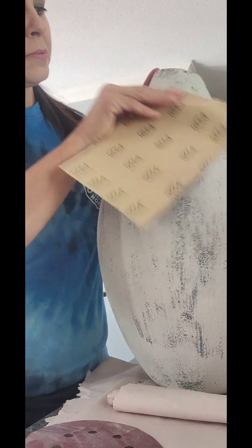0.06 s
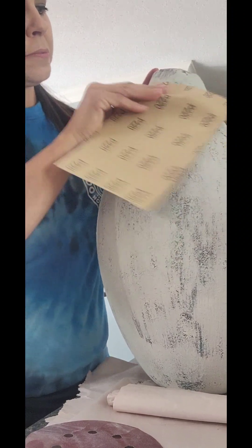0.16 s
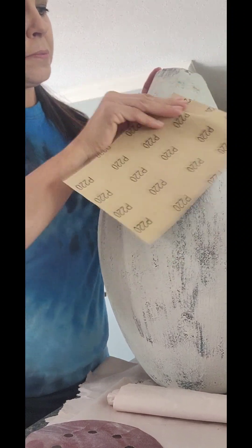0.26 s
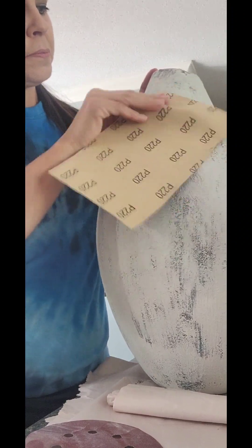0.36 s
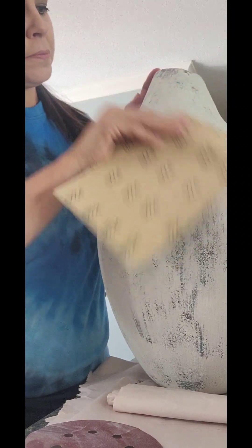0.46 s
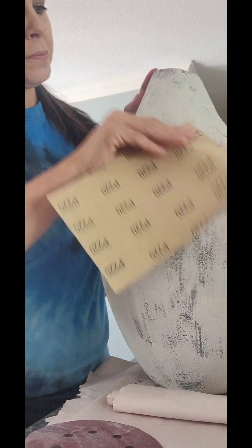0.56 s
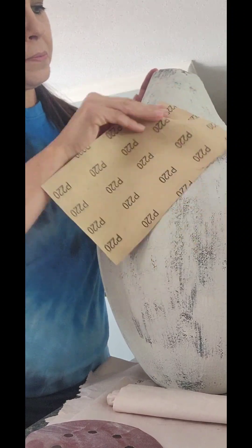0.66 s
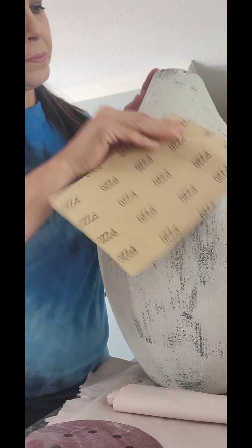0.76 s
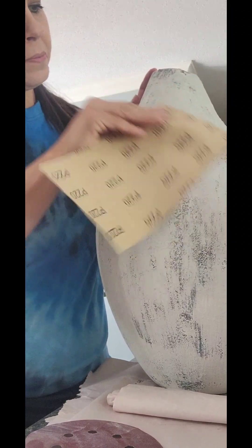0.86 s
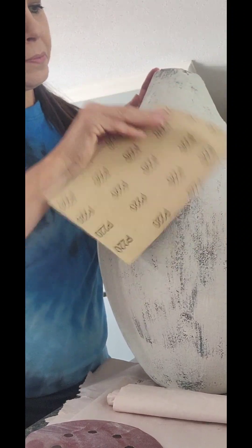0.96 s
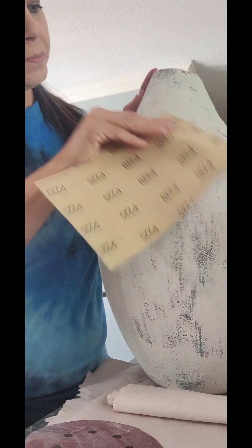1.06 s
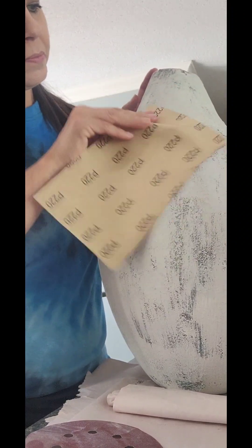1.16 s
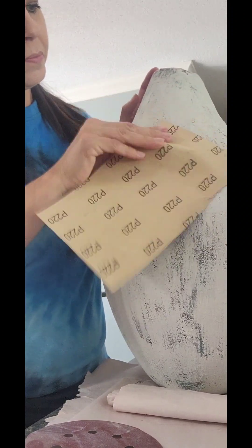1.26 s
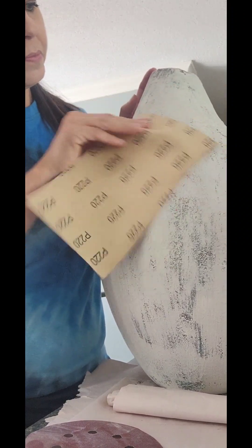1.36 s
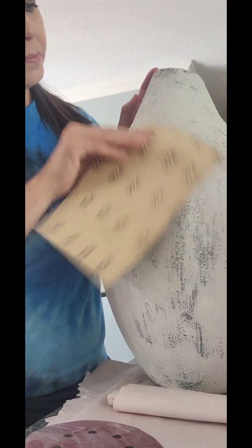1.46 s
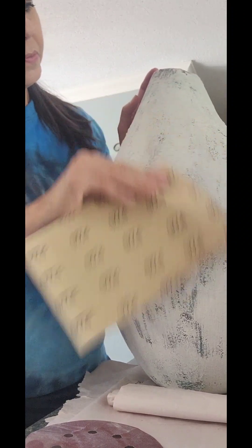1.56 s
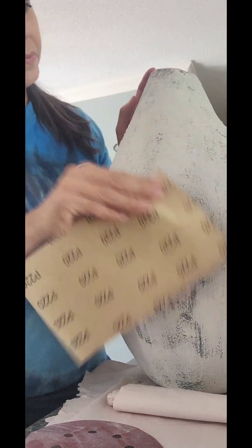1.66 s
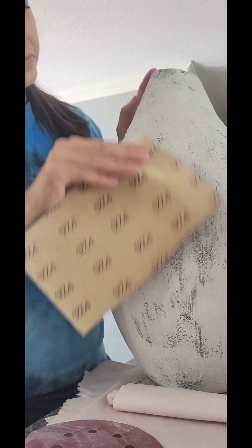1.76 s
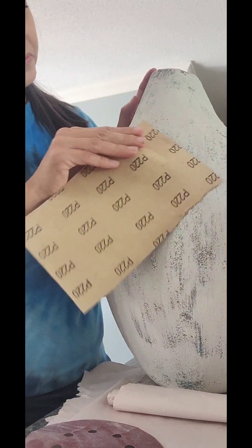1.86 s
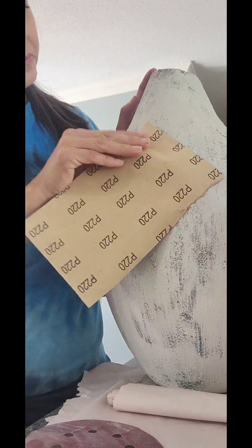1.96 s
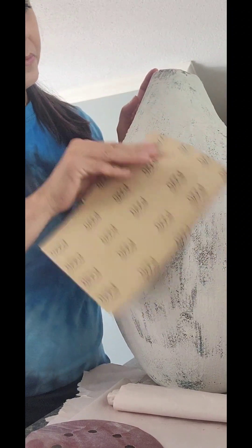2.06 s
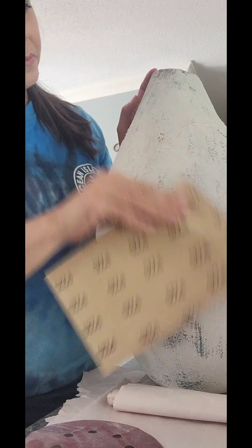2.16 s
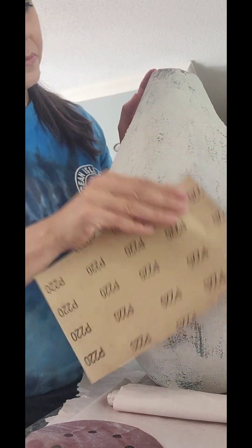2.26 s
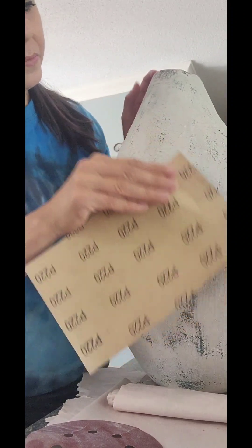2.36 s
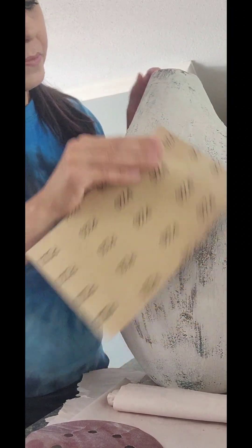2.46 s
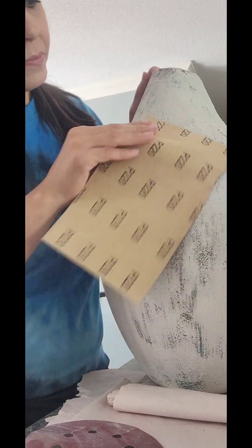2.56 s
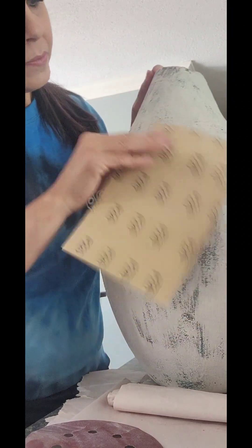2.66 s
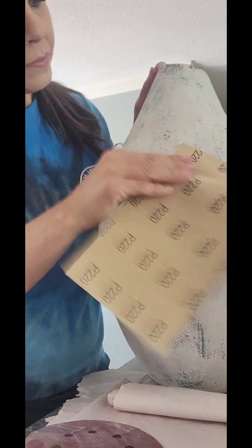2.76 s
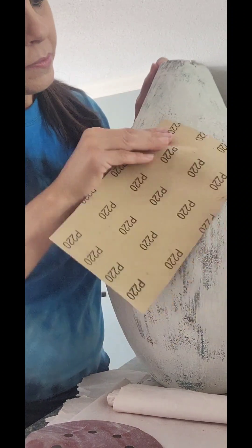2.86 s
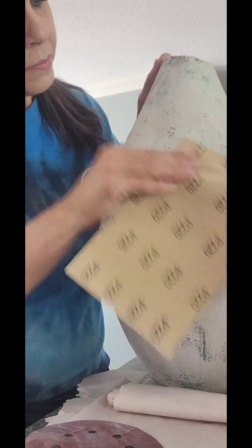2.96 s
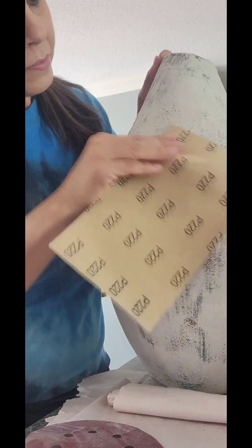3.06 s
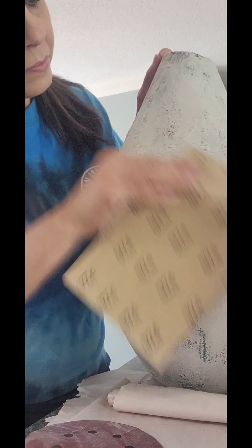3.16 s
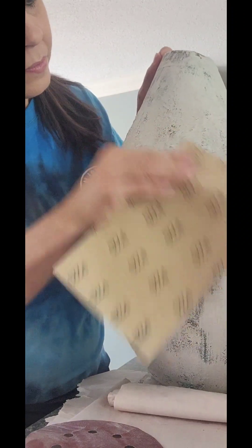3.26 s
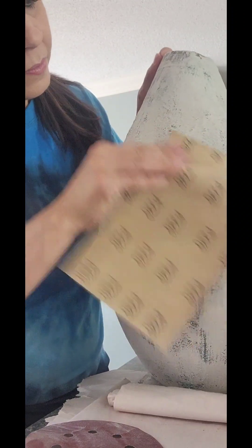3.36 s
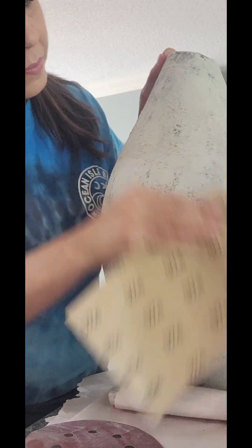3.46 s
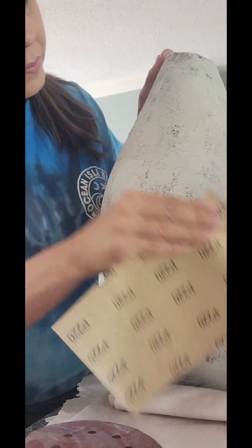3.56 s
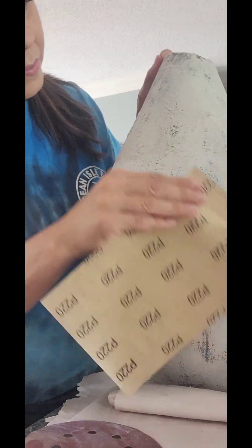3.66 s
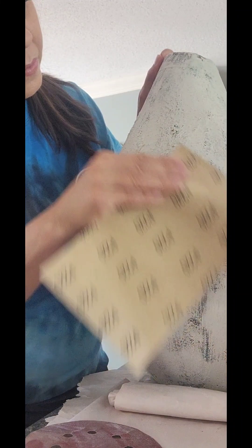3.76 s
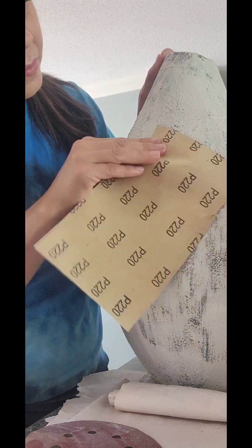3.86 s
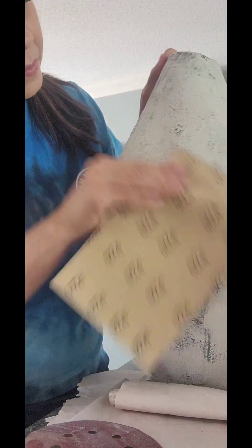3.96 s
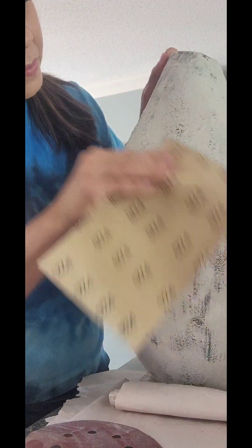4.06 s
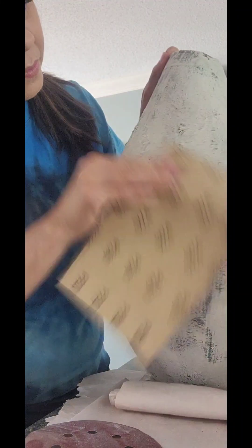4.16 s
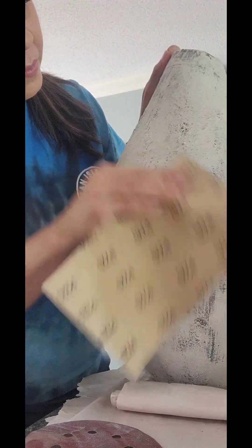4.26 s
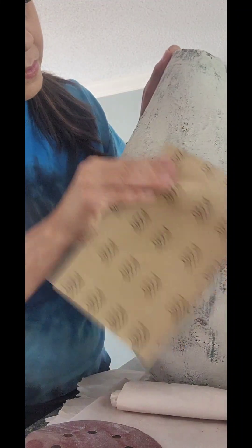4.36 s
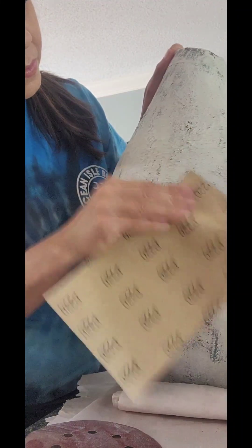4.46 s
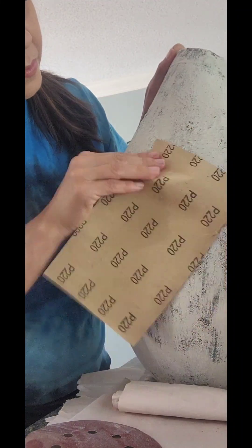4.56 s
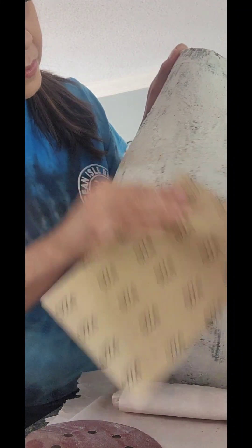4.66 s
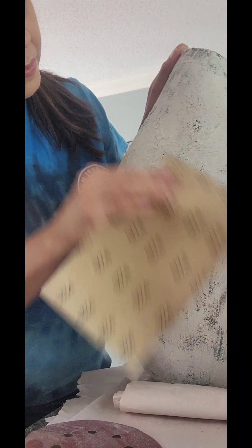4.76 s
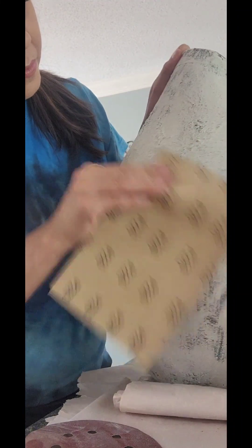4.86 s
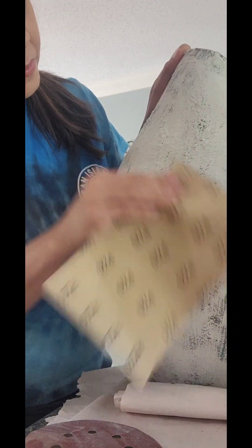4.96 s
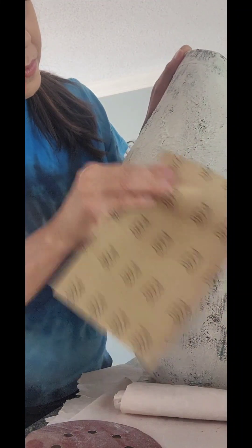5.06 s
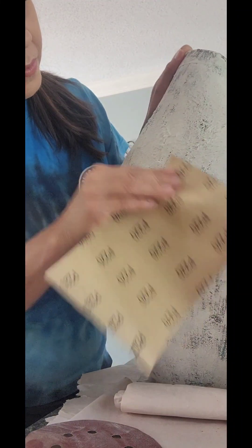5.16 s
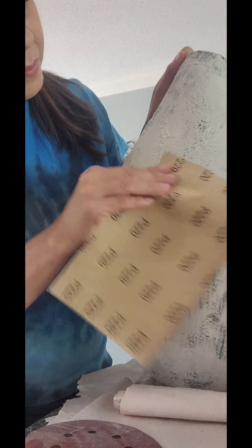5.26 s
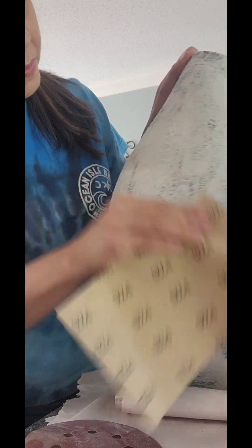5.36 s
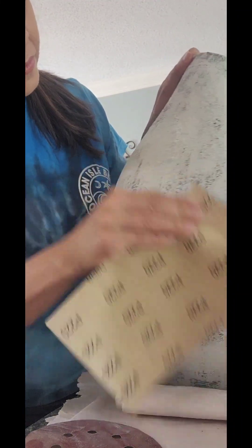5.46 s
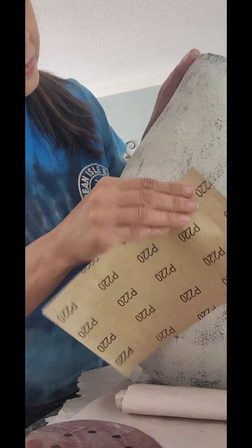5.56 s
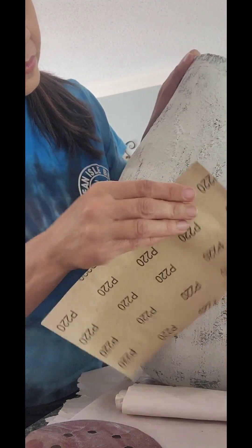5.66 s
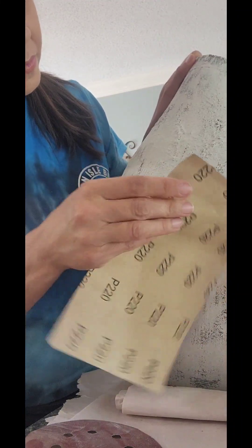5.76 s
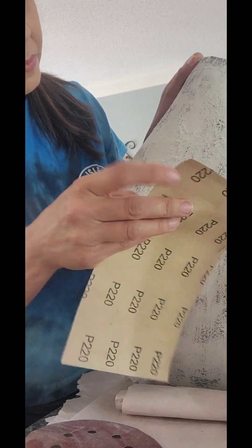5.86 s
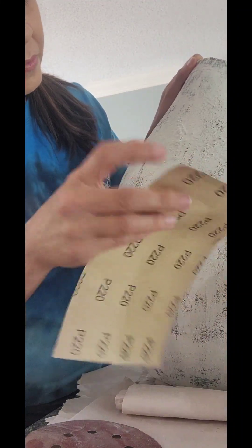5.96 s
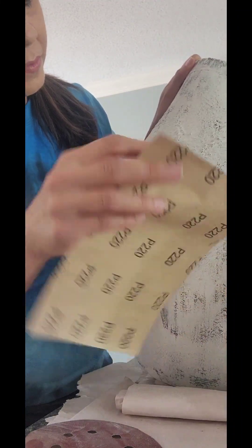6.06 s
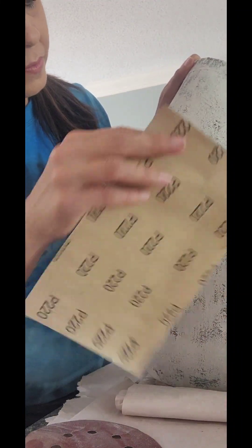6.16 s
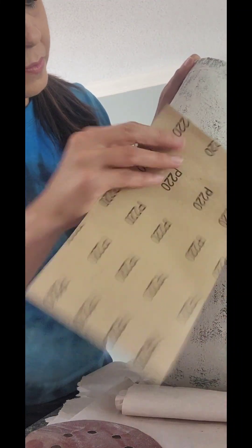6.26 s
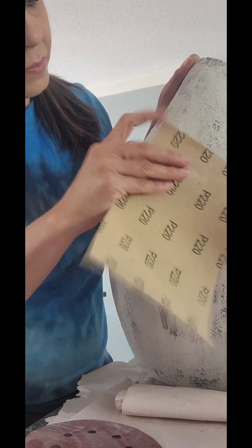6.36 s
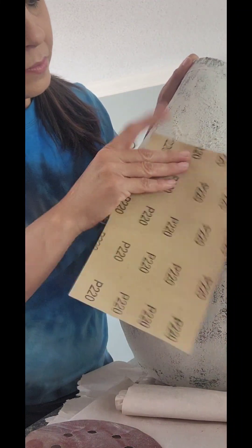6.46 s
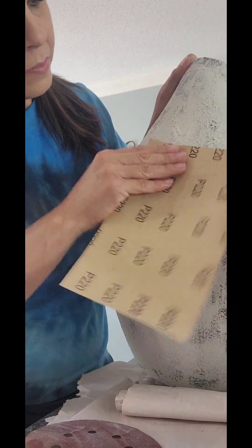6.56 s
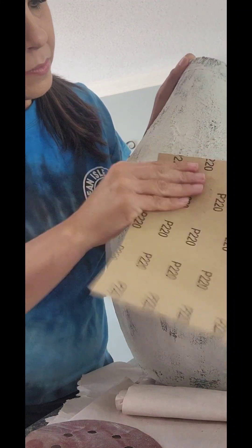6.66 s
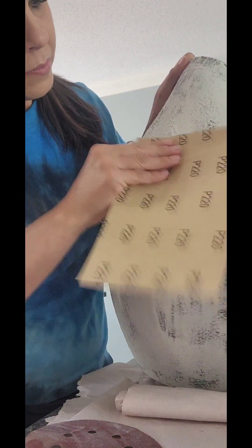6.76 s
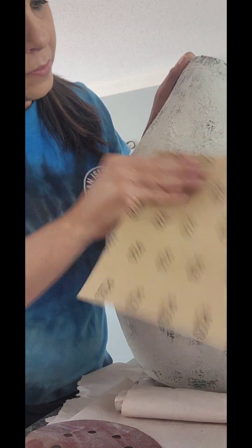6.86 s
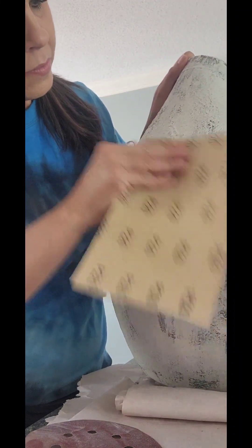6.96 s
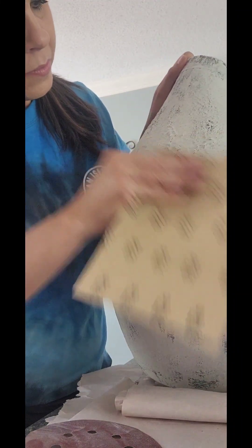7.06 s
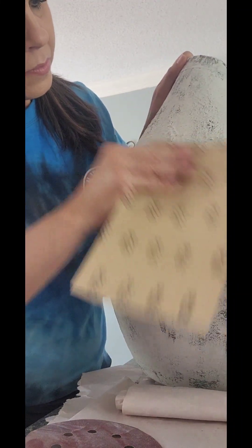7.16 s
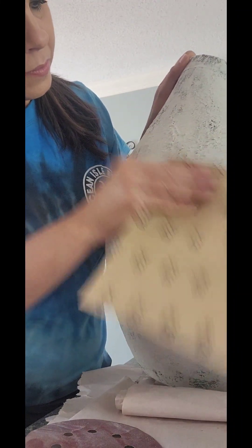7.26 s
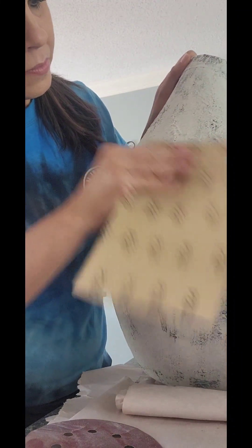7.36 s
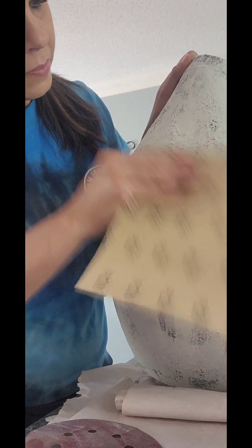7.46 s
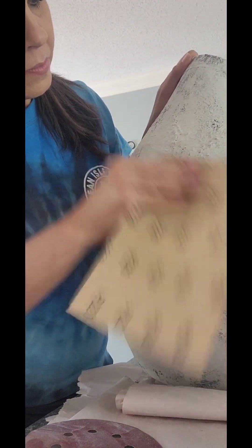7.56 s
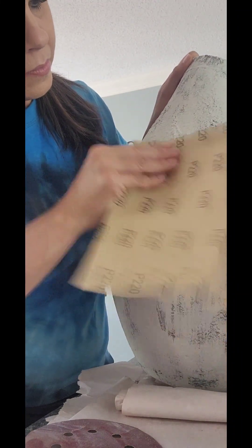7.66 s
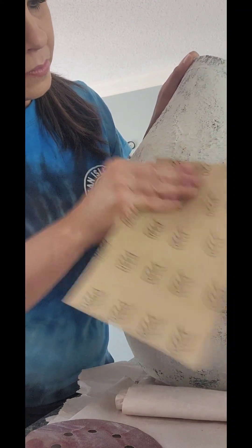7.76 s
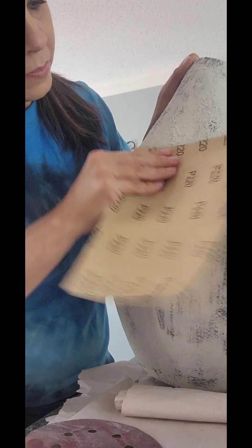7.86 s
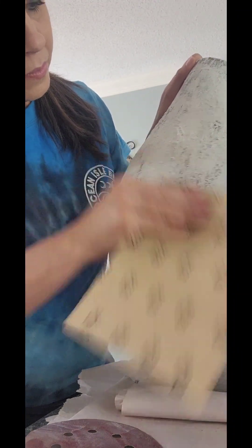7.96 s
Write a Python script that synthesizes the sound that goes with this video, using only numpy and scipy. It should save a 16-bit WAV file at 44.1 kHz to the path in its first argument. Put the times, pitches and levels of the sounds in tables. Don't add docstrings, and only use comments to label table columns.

```python
import sys
import numpy as np
from scipy import signal
from scipy.fft import rfft, irfft
from scipy.io import wavfile
from scipy.ndimage import uniform_filter1d

SR = 44100
rng = np.random.default_rng(int(sys.argv[2]) if len(sys.argv) > 2 else 0)


def put_to_file(sound):
    columns = np.atleast_2d(sound).T
    safe = np.clip(columns, -1, 1)
    whole_steps = np.round(safe * 32767)
    wavfile.write(sys.argv[1], SR, whole_steps.astype(np.int16))


def undo_db(level):
    steps = np.asarray(level, float) / 20
    return 10 ** steps


N = 354123
HZ = np.fft.rfftfreq(512, 1 / SR)


def evened(x):
    return x / np.sqrt(np.mean(x ** 2) + 1e-20)


def read(points, hz, column=1):
    table = np.transpose(points)
    return np.interp(np.log(hz + 1), np.log(table[0] + 1), table[column])


def bell(hz, width):
    return 1 / (1 + (2 * (HZ - hz) / width) ** 2)


def drifting(hz, width, drift):
    wander = 0.035
    return 1 / (1 + (2 * (HZ[:, None] - hz * (1 + wander * drift)) / width) ** 2)


# hz, density_db (per Hz)
FLOOR_SPECTRUM = [(15, -30), (25, -1.5), (114, 3.5), (451, -13), (560, -6), (863, -15), (962, -11.5),
                  (2610, -10.5), (5000, -17), (8830, -30), (16000, -39)]
# hz, rms_db
HUM_TONES = [(70.0, -81), (113.0, -75.5), (231.5, -81)]


def floor():
    noise = rng.standard_normal((2, N))
    shape = undo_db(read(FLOOR_SPECTRUM, np.fft.rfftfreq(N, 1 / SR)))
    t = np.arange(N) / SR
    hum = sum(undo_db(db + 4) * np.sin(2 * np.pi * hz * t) for hz, db in HUM_TONES)
    shared = noise + 0.41 * noise[::-1]
    return hum + undo_db(-64.5) * evened(irfft(rfft(shared) * shape, N))


# start_s, end_s, early_level_db, late_level_db, palm_pressure_db
SHOULDER_STROKES = [(-0.04, 0.046, -24, -27.5, -1), (0.081, 0.152, -27.5, -24, -1.5),
                    (0.183, 0.265, -27.5, -26.5, 0.5), (0.3, 0.376, -26, -24.5, -1.5),
                    (0.406, 0.485, -30, -28.5, 4.5), (0.532, 0.628, -21.5, -20.5, -2),
                    (0.7, 0.78, -18, -22, -3.5), (0.822, 0.904, -26, -25, 0.5),
                    (0.932, 1.018, -22.5, -23.5, -1), (1.062, 1.142, -25.5, -25.5, -1.2),
                    (1.164, 1.252, -27, -24, 3), (1.294, 1.377, -28, -22, -3),
                    (1.418, 1.501, -23.5, -22, 1.5), (1.561, 1.717, -20, -25.5, -2.5)]
# start_s, end_s, early_level_db, late_level_db, palm_pressure_db
BELLY_STROKES = [
    (2.183, 2.303, -21.5, -22, -7),
    (2.789, 2.861, -22, -19, -4),
    (2.903, 2.973, -17.5, -18.5, -5),
    (3.017, 3.091, -25, -20, -2),
    (3.124, 3.193, -22.5, -22, -1.5),
    (3.228, 3.313, -23.5, -19.5, -2),
    (3.353, 3.43, -19, -22.5, -4.5),
    (3.473, 3.587, -22, -21, -3.5),
]
# start_s, end_s, early_level_db, late_level_db, palm_pressure_db
FLANK_STROKES = [(3.881, 3.967, -21, -21.5, 0), (4.012, 4.103, -25.5, -22.5, 0),
                 (4.133, 4.212, -24, -22, 2.5), (4.243, 4.334, -23, -24, 1.5),
                 (4.365, 4.433, -18, -23.5, -2), (4.465, 4.551, -23.5, -23.5, 0),
                 (4.591, 4.672, -20, -20.5, -0.5), (4.705, 4.803, -24.5, -21, 1),
                 (4.842, 4.909, -17.5, -18.5, 0.5), (4.951, 5.035, -23.5, -25, 5),
                 (5.062, 5.123, -21, -18.5, 0.7), (5.159, 5.22, -23, -24.5, 3.5),
                 (5.249, 5.31, -26.5, -24.5, 8.5), (5.413, 5.498, -20, -25, 0)]
# start_s, end_s, early_level_db, late_level_db, palm_pressure_db
ACROSS_STROKES = [(6.711, 6.77, -27.5, -25, 9), (6.813, 6.876, -21.5, -23, 2),
                  (6.923, 6.989, -22, -22.5, 2.5), (7.036, 7.097, -24.5, -22.5, 3.5),
                  (7.143, 7.206, -25.5, -22, 6), (7.246, 7.313, -22, -25, 5), (7.355, 7.424, -21, -23, 0.5),
                  (7.467, 7.536, -23.5, -20, 3), (7.583, 7.652, -21.5, -23, 2.5),
                  (7.695, 7.766, -21, -21.5, 7.5), (7.814, 7.877, -22, -23.5, 0.5),
                  (7.914, 7.966, -21.5, -19.5, 10), (8.02, 8.063, -24.5, -32, 3)]
# fizz_db, push_over_pull_fizz_db, fizz_gained_per_stroke_db, vase_sway_db
BOUT_HOLDS = [
    (-4, -0.5, 0.29, -69.5),
    (-2.3, -2, 0.28, -69),
    (-0.5, 0, 0.16, -66.5),
    (-1, -0.1, 0.29, -53.5),
]


def strokes():
    t = np.arange(N) / SR
    parts, sway = [], np.zeros(N)
    start_loss_db, start_sharpness = 5.66, 3.33
    brake_loss_db, brake_sharpness = 4.74, 4.5
    bouts = (SHOULDER_STROKES, BELLY_STROKES, FLANK_STROKES, ACROSS_STROKES)
    for bout, (fizz_db, push_db, gained_db, sway_db) in zip(bouts, BOUT_HOLDS):
        for k, (start, end, early_db, late_db, press_db) in enumerate(bout):
            span = slice(max(round((start - .1) * SR), 0), round((end + .1) * SR))
            place = (2 * t[span] - start - end) / (end - start)
            level_db = np.interp(place, [-.4, .4], [early_db, late_db]) + 0.44
            starting_db = start_loss_db * abs(place) ** start_sharpness
            braking_db = brake_loss_db * abs(place) ** brake_sharpness
            slow_db = np.minimum(np.where(place < 0, starting_db, braking_db), 150)
            held_db = np.minimum(slow_db, 18)
            bright_db = fizz_db + (-1) ** k * push_db + k * gained_db - 0.34 * press_db
            parts.append((span, level_db - slow_db, bright_db - 1.08 * held_db, press_db + 0.86 * held_db))
            sway[span] += undo_db(sway_db - slow_db / 4)
    return parts, sway


# time_s, level_db
JOLT_TIMES = [(0.01, -58), (0.18, -55), (0.38, -65), (0.54, -58), (0.64, -50), (0.71, -47), (0.94, -53),
              (1.16, -63), (1.41, -49), (1.62, -46), (1.69, -54), (3.02, -50), (3.4, -67), (4.02, -53),
              (4.36, -55), (4.68, -45), (4.96, -49), (5.16, -47), (5.25, -55), (5.37, -56), (6.64, -52),
              (6.74, -48), (6.96, -48.5), (7.07, -51), (7.24, -47), (7.4, -60), (7.49, -46), (7.66, -51),
              (7.76, -45), (7.83, -55)]
# hz, width_hz, level_db
ROCK_MODES = [(79.7, 49, -0.5), (130, 40, -10)]


def rocking(level, sway):
    t = np.arange(N) / SR
    rock = sway.copy()
    for s, jolt_db in JOLT_TIMES:
        span = slice(max(round((s - .1) * SR), 0), round((s + .1) * SR))
        rock[span] += undo_db(jolt_db) * np.exp(-((t[span] - s) / 0.025) ** 2)
    power = abs(uniform_filter1d(level ** 2, size=4000))
    rock += undo_db(-63.5) * (power / undo_db(-51.0)) ** 0.25
    noise = rng.standard_normal((2, N))
    hz = np.fft.rfftfreq(N, 1 / SR)
    shape = sum(undo_db(db) / (1 + (2 * (hz - f) / width) ** 2) ** 2 for f, width, db in ROCK_MODES)
    thrum = irfft(rfft(noise + 1.1 * noise[0]) * shape, N)
    return np.array([evened(port) for port in thrum]) * rock


# time_s, peak_db
GRIT_BITES = [(0.3047, -30.5), (0.582, -13), (0.9694, -25.5), (1.1144, -23), (1.7174, -31), (2.2314, -29),
              (2.787, -6.5), (3.9975, -10), (4.588, -9.5), (4.849, -18.5), (5.078, -10.5), (5.243, -20),
              (6.388, -23), (6.408, -34), (6.6886, -23), (6.714, -21), (6.8109, -21), (7.033, -2.5),
              (7.24, -3), (7.352, -14), (7.416, -6), (7.4587, -2.5), (7.4974, -28), (7.5867, -23),
              (7.69, -0.5), (7.8151, -10), (7.916, -25)]


def bites():
    grabs, t = np.zeros(N), np.arange(3000) / SR
    s, peak_db = np.transpose(GRIT_BITES)
    grabs[(s * SR).astype(int)] = undo_db(peak_db - 14)
    ease = (1 - np.exp(-t / 0.003)) * np.exp(-t / 0.0062)
    return signal.oaconvolve(grabs, ease)[:N]


# start_s, end_s, first_level_db, last_level_db,
# palm_pressure_db
LIGHT_SLIDES = [(0.65, 0.69, -32, -36.5, 5), (1.932, 2.089, -47, -47, 0.5), (2.105, 2.201, -41, -31.5, 5.5),
                (2.656, 2.767, -45.5, -38.5, -0.5), (2.747, 2.789, -43.5, -17.5, -0.5),
                (3.596, 3.7, -32, -57, 6.5), (3.831, 3.883, -41, -25, -8),
                (5.336, 5.411, -27.5, -28.5, 8.5), (5.486, 5.604, -30, -67.5, 5),
                (5.702, 5.798, -58, -43.5, 5.5), (5.788, 5.934, -43.5, -57, 5),
                (5.99, 6.2, -62.5, -74.5, 5.5), (6.232, 6.269, -52.5, -59, 5.5),
                (6.253, 6.267, -51, -50, -12.5), (6.455, 6.475, -46, -35.5, -8),
                (6.342, 6.449, -61.5, -48, 6), (6.466, 6.512, -31, -56, 0), (6.515, 6.604, -39.5, -32, 2),
                (6.597, 6.69, -52, -49, 7.5), (6.669, 6.742, -57.5, -20.5, -10),
                (7.124, 7.152, -26.5, -30, -11), (7.798, 7.807, -33, -34, -8.5)]


def slides():
    t = np.arange(N) / SR
    parts = []
    for start, end, first_db, last_db, press_db in LIGHT_SLIDES:
        span = slice(round(start * SR), round(end * SR))
        level_db = np.interp(t[span], [start, end], [first_db, last_db])
        light_db = np.clip(-26 - level_db, 0, 26.5)
        edge_s = np.minimum(t[span] - start, end - t[span])
        faded_db = level_db - 30 * np.exp(-edge_s / 0.0033)
        parts.append((span, faded_db, -0.34 * light_db - press_db, 0.43 * light_db + press_db))
    return parts


def rubbing(parts):
    power, fizz, boom = np.full(N, 1e-12), np.zeros(N), np.zeros(N)
    for span, level_db, fizz_db, boom_db in parts:
        part = undo_db(level_db) ** 2
        power[span] += part
        fizz[span] += part * fizz_db
        boom[span] += part * boom_db
    return np.sqrt(power), fizz / power, boom / power


def grit(grain_db, clump_db):
    size = undo_db(grain_db * np.minimum(rng.exponential(1, (2, N)), 3))
    rough = rng.standard_normal((2, N))
    fine = evened(uniform_filter1d(uniform_filter1d(rough[0], 130), 130))
    coarse = evened(uniform_filter1d(uniform_filter1d(rough[1], 600), 600))
    clumps = fine + 0.69 * coarse
    return evened(size * rng.standard_normal((2, N)) * undo_db(clump_db * clumps))


# time_s, peak_db, ring_hz, knock_below_peak_db
SNAPS_AND_TAPS = [(0.701, -1, 2090, -37), (1.675, -8, 1170, -28), (1.704, -6.5, 2170, -40),
                  (1.704, -6, 1250, -37), (1.706, -13.5, 2800, -40), (1.72, -13, 2370, -39),
                  (0.874, -12, 2170, -37), (1.198, -8.5, 2180, -40), (2.15, -24, 1270, -29),
                  (2.228, -8, 1450, -29), (2.273, -9, 2040, -33), (3.525, -6.5, 2540, -29),
                  (3.544, -10, 2340, -31), (5.243, -17, 2100, -21), (3.998, -18, 2200, -27),
                  (5.078, -3, 2200, -32), (4.38, -3.5, 2200, -34.5), (7.584, -10, 2200, -34),
                  (1.944, -33, 4460, -25), (2.661, -44, 2070, -26), (2.699, -30, 3230, -12.5),
                  (3.657, -18.5, 897, -17), (3.657, -24, 2500, -40), (3.837, -26.5, 2260, -18),
                  (5.665, -37, 560, -13.5), (5.909, -37, 3400, -14), (6.233, -48, 500, -9),
                  (6.257, -32, 400, -19.5), (6.396, -32.5, 1170, -5), (6.397, -30, 2050, -30),
                  (6.257, -38, 4300, -32), (6.633, -26, 3400, -32), (6.442, -12.5, 2180, -17.5),
                  (6.47, -7.5, 2140, -43), (6.488, -27, 2200, -16), (6.528, -15.5, 2290, -36),
                  (6.577, -33, 2090, -13), (6.635, -36, 503, -16), (7.126, -9, 2130, -32)]
# hz, level_db, t60_s
HOLLOW_MODES = [(400, -2, 0.03), (472, -8.5, 0.047), (800, -1, 0.022), (1170, 1.5, 0.022)]
# hz, left_over_right_db
TAP_BALANCE = [(1300, -5.5), (2000, -3)]


def snaps():
    t = np.arange(4000) / SR
    crackle, ring = np.zeros(N + 4000), np.zeros((2, N + 4000))
    noise = rng.standard_normal((len(SNAPS_AND_TAPS), 4000))
    rise = 1 - np.exp(-(t / 0.0032) ** 2)
    hollow = sum(undo_db(db - 60 * t / t60) * np.sin(2 * np.pi * hz * t) for hz, db, t60 in HOLLOW_MODES)
    share = 0.48
    for (s, peak_db, hz, knock_db), burst in zip(SNAPS_AND_TAPS, noise):
        at = round((s - .0005) * SR)
        pan_db = read(TAP_BALANCE, hz)
        crackle[at:at + 4000] += undo_db(peak_db + 4.5) * (1 - share) * rise * np.exp(-t / 0.0023) * burst
        tone = 3.1 * share * np.exp(-t / 0.0021) * np.sin(2 * np.pi * hz * t)
        tone = tone + undo_db(knock_db + 7.0) * hollow
        ring[:, at:at + 4000] += undo_db(peak_db) * rise * tone * undo_db([[pan_db / 2], [-pan_db / 2]])
    return crackle[:N], ring[:, :N]


# time_s, free_part (-1 to 1), curl_round_wall (-1 to 1),
# height (0 belly to 1 neck), finger_spread (-1 to 1)
SHEET_GRIP = [(0, -0.44, -0.3, 1, -.5), (.45, 0.2, -0.5, 0.78, -.3), (.65, 0.5, -.5, 0.58, -.3),
              (.9, 0.55, 0.2, 0.52, -.2), (1.4, 0.31, .2, 1, -.2), (1.65, 0.7, 0.4, 0.22, .3),
              (2.0, 0.99, -.3, 1, 0), (2.25, 0.4, -.6, 0.03, .6), (2.8, 0.37, 0.73, 0.45, .3),
              (3.2, 0.33, .7, 0, .3), (3.6, 0.83, 0.68, 0, .3), (3.9, 0.66, .8, 0.26, .4),
              (4.4, 0.54, .5, 0.14, .5), (4.8, 0.48, -0.3, 0.051, .5), (5.5, 0.66, -0.4, 0.43, .4),
              (6.4, 0.83, 0.5, 0.043, 0), (6.8, -0.62, 0.41, 0.13, 0), (7.4, -0.82, 0.72, 0.55, 0.098),
              (8.03, -0.5, 0.45, 0.83, .2)]
# hz, width_hz, level_at_neck_db
NECK_MODES = [(2080, 350, 3), (2750, 700, -2), (3780, 300, 0.5), (5240, 700, -1.5), (7600, 500, -5)]


def grip_colour(t, fizz_db, boom_db):
    s, *grip = np.transpose(SHEET_GRIP)
    free, curl, height, spread = (np.interp(t, s, column) for column in grip)
    shift_db = np.outer(read([(5500, 0.1), (8500, 0.85)], HZ), fizz_db - 1.5 * curl)
    shift_db += np.outer(read([(800, 1), (1100, 0)], HZ), boom_db)
    shift_db += np.outer(bell(1280, 660), 6 * free)
    drift = rng.standard_normal((3, len(t)))
    drift = evened(uniform_filter1d(uniform_filter1d(drift, size=30), size=30))
    shift_db += drifting(2136, 450, drift[0]) * (2.5 - 4 * free)
    shift_db += drifting(3774, 150, drift[1]) * (-9 * height - 3.5)
    shift_db += drifting(6850, 160, drift[2]) * -4.5
    shift_db += np.outer(bell(3400, 500), 5 * curl + 1.0)
    shift_db += np.outer(bell(4460, 600), 2.5 * spread + 0.8)
    neck_db = sum(db * bell(hz, width) for hz, width, db in NECK_MODES)
    shift_db += np.outer(neck_db, height - 0.4)
    patches = rng.standard_normal(shift_db.shape)
    shift_db += 2.3 * evened(uniform_filter1d(uniform_filter1d(patches, 2, 0), 36, 1))
    shift_db += 1.6 * evened(uniform_filter1d(uniform_filter1d(patches[::-1], 9, 0), 14, 1))
    return shift_db


# hz, left_db, right_db
SCRATCH_COLOUR = [(119, -30.5, -25), (260, -24, -24), (494, -20, -19.5), (884, -23.5, -17.5),
                  (1205, -14, -2.5), (1670, -3, -2), (2620, -2.5, -1.5), (4990, -4.5, -4.5),
                  (7190, -8, -11.5), (8570, -14.5, -22.5), (9260, -18.5, -24.5), (12200, -19, -19),
                  (15850, -17, -17.5)]
# hz, width_hz, left_db, right_db
WALL_MODES = [(370, 46, 2, 3), (510, 39, 6.5, 7), (693.2, 27, 8.5, 10), (1160, 130, 9, 4),
              (2090, 540, 4, 3.5), (3326, 570, 2.5, 4), (4274, 290, 0, 5), (4950, 400, 5, 5),
              (5870, 310, 2.5, 5.5), (6470, 280, 6, 4), (7580, 690, 1, 4.5), (12530, 1500, 4, 6)]
# hz, width_hz, left_db, right_db
REFLECTION_NOTCHES = [(1567, 100, -11.5, -4), (2420, 70, -10, -5.5), (3040, 290, -4.5, -3.5),
                      (3710, 310, 3, -1), (4650, 200, -7, -5.5), (5660, 120, -4, -3.5),
                      (6450, 120, -1.5, 0.5), (6880, 190, 1.5, -3.5), (7700, 130, -6, -1.5)]


def port_colour():
    colour_db = []
    for k in (1, 2):
        bumps_db = sum(m[1 + k] * bell(m[0], m[1]) for m in WALL_MODES + REFLECTION_NOTCHES)
        colour_db.append(read(SCRATCH_COLOUR, HZ, column=k) + bumps_db)
    return evened(undo_db(colour_db))[:, :, None]


# hz, phase_rad
LEFT_LEAD = [(0, -2), (690, 0.94), (1380, 2), (1640, 1.48), (2070, 5.5), (3190, 10.0), (3700, 16),
             (4310, 17.5), (5510, 25.5), (7320, 27), (9910, 42), (12700, 43), (15400, 42.5), (16000, 67)]
# hz, coherence (0 to 1)
PORT_COHERENCE = [(100, 0.97), (600, 1), (2000, 0.63), (6000, 0.53), (12000, 0.09)]


def sanding(level, fizz_db, boom_db):
    crackle, ring = snaps()
    drive = (level + abs(bites())) * grit(grain_db=1.5, clump_db=1.1)
    drive[0] += crackle
    t, (near, far) = signal.stft(drive, SR, nperseg=512, noverlap=384)[1:]
    at = np.minimum((t * SR).astype(int), N - 1)
    shift_db = grip_colour(t, fizz_db[at], boom_db[at])
    same = read(PORT_COHERENCE, HZ)[:, None]
    lag = np.exp(-1j * np.interp(HZ, *np.transpose(LEFT_LEAD)))[:, None]
    ports = np.array([near, lag * (same * near + np.sqrt(1 - same ** 2) * far)])
    coloured = ports * port_colour() * undo_db(shift_db)
    return signal.istft(coloured, SR, nperseg=512, noverlap=384)[1][:, :N] + ring


# hz, t60_s
REVERB_TIME = [(200, 0.39), (1000, 0.39), (3000, 0.4), (7000, 0.22), (10000, 0.31), (15000, 0.2)]


def room(x):
    taps = np.zeros((4, SR // 2))
    at = np.arange(300, SR // 2 - 20, 20) + rng.integers(0, 20, (4, (SR // 2 - 301) // 20))
    np.put_along_axis(taps, at, rng.choice([-1., 1.], at.shape), 1)
    hz, t, z = signal.stft(taps, SR, nperseg=256)
    decay = undo_db(-60 * t / read(REVERB_TIME, hz)[:, None])
    tail = signal.istft(z * decay, SR, nperseg=256)[1]
    turn = 2 * np.pi * 7 * np.arange(N) / SR
    sent = np.vstack([x * np.cos(turn), x * np.sin(turn)])
    wet = signal.fftconvolve(sent, tail / np.linalg.norm(tail[0]), axes=1)
    return wet[:2, :N] + wet[2:, :N]


def scene():
    parts, sway = strokes()
    level, fizz_db, boom_db = rubbing(parts + slides())
    dry = sanding(level, fizz_db, boom_db)
    return dry + undo_db(-13.5) * room(dry) + rocking(level, sway) + floor()


def top_cut(x):
    return signal.sosfilt(signal.butter(12, 15960, fs=SR, output="sos"), x)


def record(dry):
    lowpass = signal.firwin(511, 15900, window=("kaiser", 9), fs=SR)
    limited = signal.oaconvolve(dry, lowpass[None], "same")
    return top_cut(limited)


dry = scene()
out = record(dry)
put_to_file(out)
```